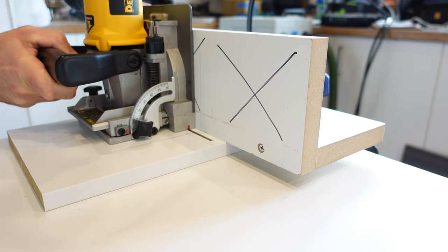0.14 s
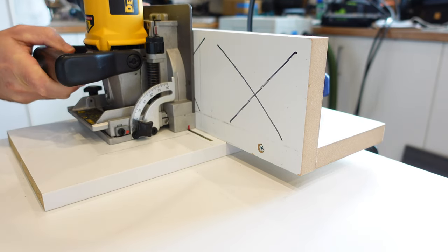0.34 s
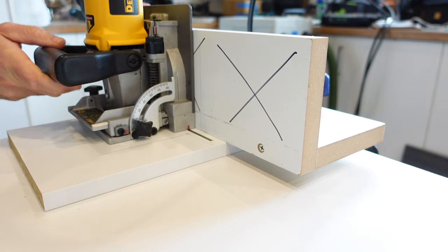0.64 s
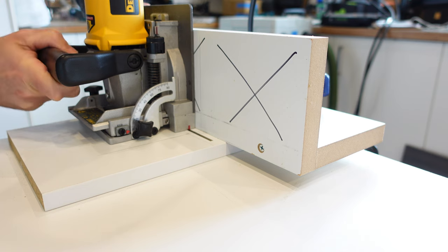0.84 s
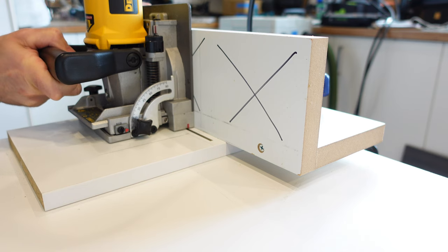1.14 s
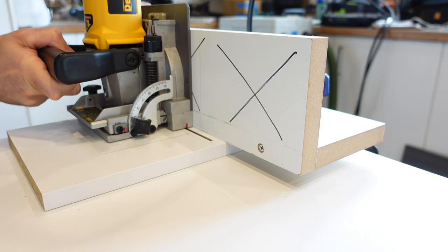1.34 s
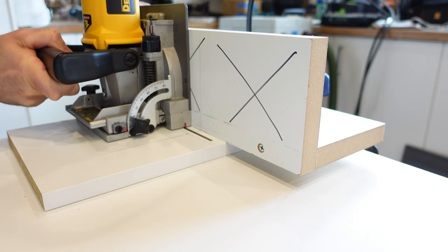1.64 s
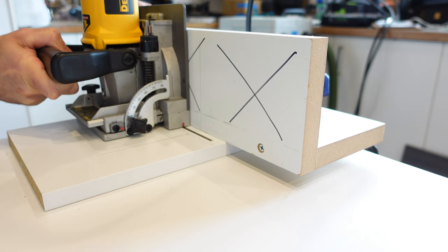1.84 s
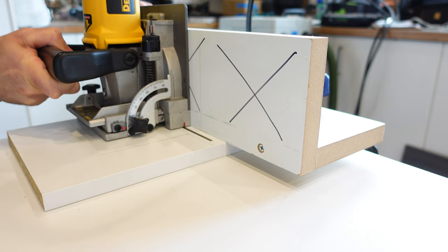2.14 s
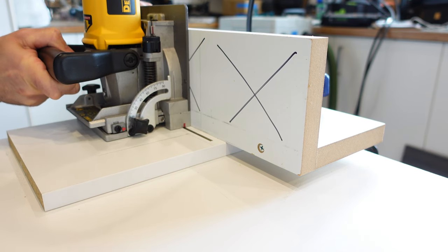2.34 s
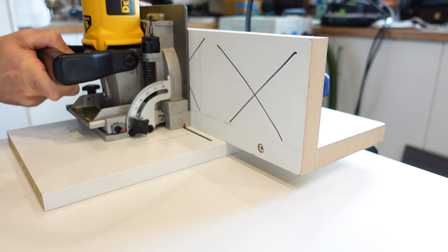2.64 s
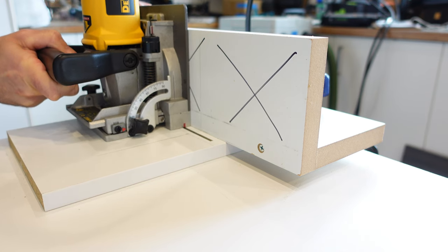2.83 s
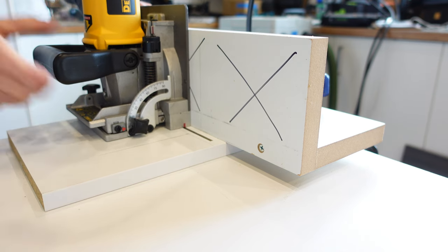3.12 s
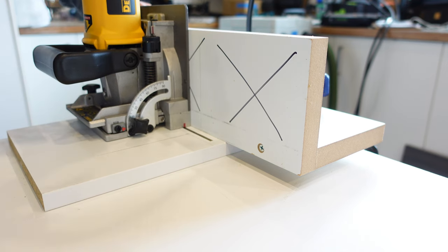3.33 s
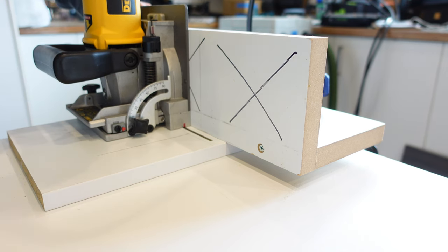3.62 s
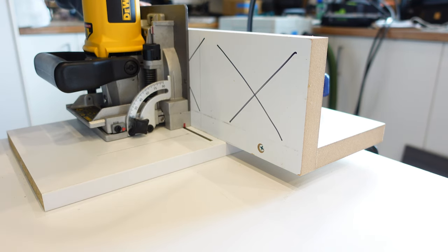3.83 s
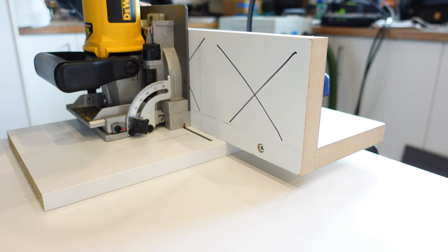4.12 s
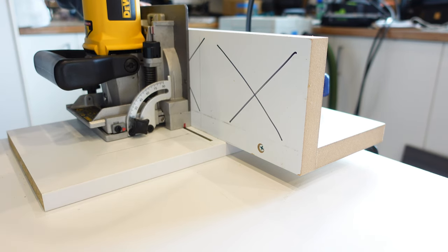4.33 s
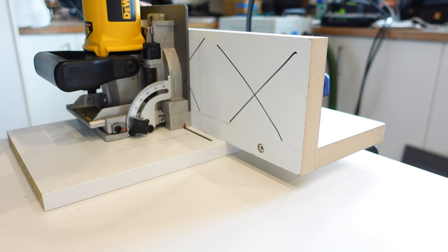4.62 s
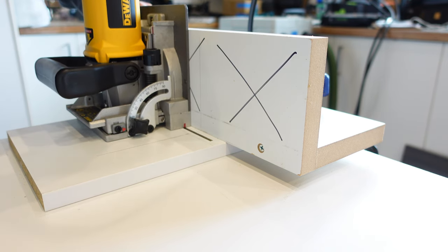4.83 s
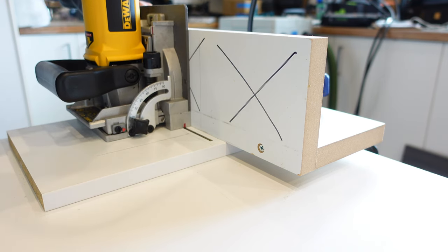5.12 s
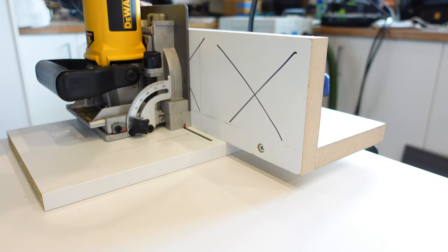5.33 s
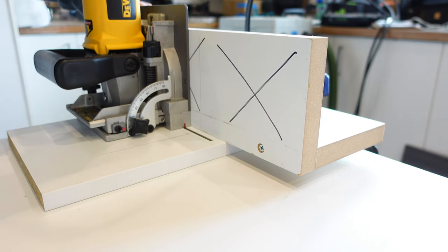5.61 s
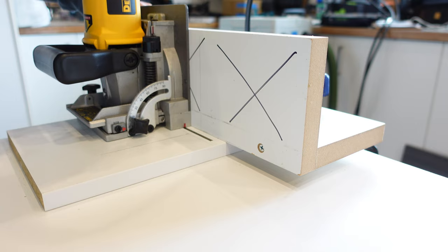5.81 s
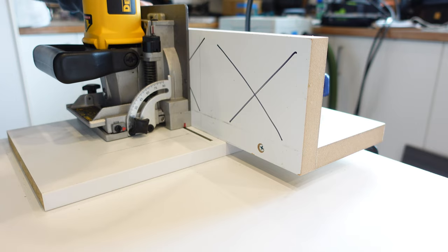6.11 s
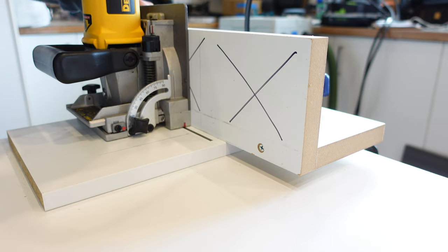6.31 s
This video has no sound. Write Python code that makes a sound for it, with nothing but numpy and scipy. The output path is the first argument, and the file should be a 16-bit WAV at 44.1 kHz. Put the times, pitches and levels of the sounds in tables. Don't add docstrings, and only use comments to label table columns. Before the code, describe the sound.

Scraping, squeaks and sharp taps of a power tool on board, then a click, a roaring rising whine, a brief cut and a clacking coast-down.

```python
import sys
import numpy as np
from scipy import signal
from scipy.fft import rfft, irfft, next_fast_len
from scipy.io import wavfile
from scipy.ndimage import uniform_filter1d, minimum_filter1d, map_coordinates

SR = 44100
rng = np.random.default_rng(int(sys.argv[2]) if len(sys.argv) > 2 else 0)


def log_audio(samples):
    frames = np.atleast_2d(samples).T
    limited = np.clip(frames, -1, 1)
    pcm = np.round(limited * 32767).astype(np.int16)
    wavfile.write(sys.argv[1], SR, pcm)


def field_ratio(decibels):
    return 10 ** (np.asarray(decibels, dtype=float) / 20)


N = 284886
TIME = np.arange(N) / SR

MAINS_HZ = 100
ON_S, RUSH_S, OFF_S = 4.2031, .121, 5.7
MESH = 7.035
STROKE_FALL_DB = 7.5


def unit(x):
    return x / np.sqrt(np.mean(x ** 2) + 1e-20)


def along(points, hz):
    f, v = np.transpose(points)
    return np.interp(np.log(hz + 1), np.log(f + 1), v)


def wobble(rate):
    knots = rng.standard_normal(int(N * rate / SR) + 4)
    return map_coordinates(knots, [np.arange(N) * rate / SR])


def ramp(start_s, length_s):
    return .5 + .5 * np.tanh((TIME - start_s) / length_s)


def band(hz, lo_hz, hi_hz):
    return 1 / np.sqrt((1 + (lo_hz / (hz + 1)) ** 8) * (1 + (hz / hi_hz) ** 8))


def filtered(x, response):
    m = next_fast_len(N + SR // 2)
    return irfft(rfft(x, m) * response(np.fft.rfftfreq(m, 1 / SR)), m)[:N]


def grit(grain_db, rate, lump_db):
    return rng.standard_normal(N) * field_ratio(grain_db * wobble(900) + lump_db * wobble(rate))


def patchy(x, depth_db):
    z = signal.stft(x, nperseg=256)[2]
    field = uniform_filter1d(rng.standard_normal(z.shape), size=3, axis=0)
    field = uniform_filter1d(field, size=24, axis=1)
    return signal.istft(z * field_ratio(depth_db * unit(field)), nperseg=256)[1][:N]


def swells(rows):
    s, half, *cols = np.transpose(rows)[:, :, None]
    t = np.arange(0, N + 64, 64) / SR
    shape_db = -STROKE_FALL_DB * ((t - s) / half) ** 2
    return [np.interp(TIME, t, np.sqrt((field_ratio(db + shape_db) ** 2).sum(axis=0))) for db in cols]


def still_air():
    # (frequency [Hz], density [dB per Hz])
    air_tone = [(15, -47), (25, -23), (120, 2.5), (179, -13), (255, 0.5), (307, -9.5), (513, -6),
                (2150, -23), (5090, -47), (15800, -30.5)]
    return field_ratio(-73) * unit(filtered(rng.standard_normal(N), lambda f: field_ratio(along(air_tone, f))))


def shop(x):
    # (frequency [Hz], time to fall 60 dB [s])
    decay = [(150, 0.64), (1000, 0.23), (4000, 0.33), (12000, 0.012)]
    hz, t, z = signal.stft(rng.standard_normal(SR // 2), SR, nperseg=256)
    tail = signal.istft(z * field_ratio(-60 * t / along(decay, hz)[:, None]), SR, nperseg=256)[1]
    return signal.fftconvolve(np.pad(x, (300, 0)), tail / np.linalg.norm(tail))[:N]


def extractor():
    on_s, shaft_per_rotor = 4.93, .545
    hz = 601 - 190 * np.exp(-np.clip(TIME - on_s, 0, 9) / .33)
    fan = np.sin(2 * np.pi * np.cumsum(hz * (1 + 0.002 * wobble(18))) / SR)
    shaft = np.sin(2 * np.pi * np.cumsum(shaft_per_rotor * speed() * (1 + .004 * wobble(18))) / SR)
    shaft_db = -48 - 6 * ramp(5.8, .06) - 12 * ramp(6.08, .06) + 1.5 * wobble(6)
    gaps = ramp(5.11, .02) - ramp(5.22, .02) + ramp(5.47, .02) - ramp(5.58, .02)
    lines = ramp(on_s, .03) * field_ratio(-46.5 - 9 * gaps + 1.3 * wobble(12)) * fan
    lines = lines + ramp(5.38, .03) * field_ratio(shaft_db) * shaft
    hiss = unit(filtered(rng.standard_normal(N), lambda f: band(f, 11000, 17000)))
    return lines + field_ratio(-70.0) * hiss


def handling():
    # (middle [s], half length [s], weight on the bench [dB], slide [dB], rub [dB])
    strokes = [(0.03, 0.23, -86, -59, -66), (.3, 0.23, -63.5, -61.5, -68.5), (.65, 0.51, -69.5, -71, -79),
               (.94, 0.099, -62, -60.5, -82), (1.13, 0.036, -62, -66, -81), (1.32, 0.096, -63, -60, -71.5),
               (1.48, 0.087, -69, -62.5, -84), (1.66, 0.15, -69, -64.5, -76.5),
               (1.81, 0.087, -58, -61.5, -78.5), (1.94, 0.063, -63, -59, -74), (2.02, 0.065, -62, -62, -82),
               (2.35, 0.9, -79, -90, -87), (2.66, 0.056, -68.5, -90, -84), (2.93, 0.11, -69, -66, -76.5),
               (3.2, 0.19, -74, -72.5, -77.5), (3.36, 0.2, -66, -71.5, -87), (3.52, 0.19, -68, -69.5, -68),
               (3.81, 0.087, -61, -64.5, -68.5), (4.05, 0.93, -74.5, -74.5, -80),
               (4.27, 0.041, -60, -86, -85), (4.75, 0.38, -63, -68, -76), (5.3, 0.37, -59, -58, -86),
               (6.1, 0.33, -66, -75, -79)]
    # (middle [s], half length [s], level [dB])
    sleeve = [
        (.3, 0.14, -94),
        (1.32, 0.036, -80),
        (3.2, 0.048, -72),
        (3.36, 0.1, -81),
        (3.6, 0.039, -79),
        (3.98, 0.047, -91),
    ]
    # (frequency [Hz], density [dB per Hz])
    bench_tone = [(24, -64), (40, -46), (76, -11), (113, 4), (196, 1.5), (291, 1), (400, -1.5), (520, -55),
                  (880, -120)]
    scuff_tone = [(120, -43), (200, 8.5), (239, -11), (369, 6.5), (554, 8), (726, 1.5), (1100, 1.5),
                  (1600, -4), (2400, -14.5), (3120, -44), (5280, -120)]
    rustle_tone = [(940, -30), (1600, 10), (1830, 4.5), (2230, 7), (2660, 8.5), (5000, 2), (6500, -12),
                   (11000, -120)]
    hiss_tone = [(2940, -14.5), (5000, -12), (7140, -13), (7980, -15), (14300, -27), (15800, -23)]

    def hollow(f):
        notes = [(785, 1.2), (1300, .8), (1920, .8)]
        return 1 + sum(lift / (1 + (2 * (f - hz) / 110) ** 2) for hz, lift in notes)

    weight, slide, rub = swells(strokes)
    cloth = field_ratio(-83) * (rub / field_ratio(-72.5)) ** 0.93 + swells(sleeve)[0] + field_ratio(-87.5)
    out = np.zeros(N)
    for gain, tone, lump_db in [(weight, bench_tone, 1.4), (slide, scuff_tone, 2.3),
                                (rub, rustle_tone, 1.15), (cloth, hiss_tone, 1.5)]:
        noise = grit(grain_db=-0.5, rate=54, lump_db=lump_db)
        out = out + gain * unit(filtered(noise, lambda f: field_ratio(along(tone, f)) * hollow(f)))
    return out


def drag():
    # (middle [s], half length [s], hum [dB], squeal [dB])
    pulls = [
        (.03, 0.2, -57.5, -95),
        (0.315, 0.15, -59, -71),
        (0.627, 0.26, -66, -87),
    ]
    # (frequency [Hz], width [Hz])
    modes = [(770, 220), (4250, 2000)]
    out = np.zeros(N)
    for gain, (hz, wide_hz) in zip(swells(pulls), modes):
        noise = grit(grain_db=-2, rate=27.3, lump_db=-0.5)
        out = out + gain * unit(filtered(noise, lambda f: 1 / (1 + (2 * (f - hz) / wide_hz) ** 2)))
    return out


def squeaks():
    # (middle [s], half length [s], frequency [Hz], glide [Hz per s], level [dB])
    slips = [
        (.31, .1, 4150, 1800, -70),
        (.3, .06, 4950, 900, -76),
        (.28, .05, 5900, 2000, -77),
        (2.93, .05, 1100, 4000, -70),
        (3.2, .04, 6100, 3000, -76),
        (3.81, .025, 3100, 9000, -71),
        (1.57, .02, 1950, 0, -69),
        (1.7, .025, 1980, 0, -69),
        (2.0, .02, 1200, 0, -57),
        (1.75, .03, 980, 0, -59.5),
    ]
    out = np.zeros(N + SR)
    for s, half, hz, glide, db in slips:
        t = np.arange(-2 * half, 2 * half, 1 / SR)
        rows = np.repeat([[0], [1]], len(t), 1)
        drift = map_coordinates(rng.standard_normal((2, 300)), [rows, [(t - t[0]) * 500] * 2])
        note = np.sin(2 * np.pi * np.cumsum((hz + glide * t) * (1 + .08 * drift[0])) / SR)
        level = field_ratio(db + 3 * drift[1] - STROKE_FALL_DB * (t / half) ** 2)
        out[round((s - 2 * half) * SR):][:len(t)] += level * note
    return out[:N]


def ticks():
    # (time [s], peak [dB], ring [Hz])
    parts = [(0.1147, -36.5, 3080), (0.1151, -41, 1590), (0.83, -50, 2580), (0.9308, -44, 2600),
             (1.153, -30, 5160), (1.2525, -49, 5300), (1.318, -43, 2540), (1.317, -38, 5130),
             (1.284, -42, 3900), (.855, -50, 2000), (1.022, -56, 3900), (1.635, -33.5, 1256),
             (1.6347, -34.5, 3000), (1.636, -35, 4730), (1.667, -51, 5300), (1.682, -50, 5300),
             (2.622, -44.5, 1460), (1.7565, -49, 2850), (1.901, -36, 4340), (1.902, -36, 5100),
             (1.903, -56, 5300), (1.9013, -45, 7700), (1.9345, -53, 5000), (2.6848, -55, 4760),
             (2.8426, -62, 2320), (3.4328, -43.5, 2280), (3.7244, -52, 5500), (3.9858, -56, 4360),
             (4.1494, -59, 6560), (4.1814, -59, 7000)]
    fence_hz = [1610, 2260, 3500, 4730, 7250]
    out, t = np.zeros(N + SR), np.arange(SR // 8) / SR
    rattle = []
    for hz, (u, v) in zip(np.resize(fence_hz, 60), rng.random(size=(60, 2))):
        db = -34 - 17 * u - 6 * v - 3.5 * np.log2(hz / 2000)
        rattle.append((1.268 + .1 * u ** 1.9, db, hz))
    for s, db, hz in parts + rattle:
        modes = [(1.5, 1), (.6, rng.uniform(.82, .92)), (.5, rng.uniform(1.08, 1.25))]
        trio = sum(g * np.sin(2 * np.pi * hz * k * t) for g, k in modes)
        decay = field_ratio(db - 10.0 - 60 * t * hz / 49)
        out[round((s + .001) * SR):][:len(t)] += decay * trio * (1 - np.exp(-t / 0.00027))
    return out[:N]


def knocks():
    # (time [s], peak [dB], ring [Hz], crack [dB], fizz [dB])
    tool_blows = [(0.828, -51, 684, -12, -41), (0.845, -26.5, 748, -16.5, -63), (0.869, -46, 740, -30, -55),
                  (0.929, -46, 1200, -24, -49), (0.967, -39, 1334, -10, -30), (1.031, -49.5, 566, -18, -46),
                  (1.13, -45, 1100, -11, -49), (1.138, -23.5, 812, -27, -48),
                  (1.153, -37, 596, -8.5, -25.5), (1.163, -44, 630, -30, -55), (1.221, -44, 847, -35, -44),
                  (1.251, -43.5, 1610, -12, -44), (1.263, -33.5, 1190, -8, -38),
                  (1.312, -23.5, 1610, -20.5, -51), (1.632, -37, 760, -11, -55),
                  (1.669, -49, 1150, -8, -34), (1.711, -48.5, 624, -24, -43), (1.809, -35.5, 570, -39, -59),
                  (2.841, -54, 650, -5, -25), (4.119, -54.5, 920, -19, -41), (4.173, -53, 875, -11, -31)]
    # (time [s], peak [dB], ring [Hz], bench thump [dB])
    base_bumps = [(0.114, -42, 765, -11), (1.059, -51.5, 586, -15), (1.094, -53, 230, -2),
                  (1.487, -51.5, 620, -2), (1.955, -30.5, 780, -4.5), (2.37, -55, 770, 3.5),
                  (2.623, -43, 772, 2.5), (2.655, -50, 730, -22), (2.749, -56.5, 840, -1),
                  (2.765, -62, 344, -17), (2.801, -56.5, 855, -16), (2.893, -60, 885, -17),
                  (2.911, -57, 855, -17), (2.924, -53, 760, -10), (2.954, -46, 754, -1),
                  (2.977, -47.5, 755, -2), (3.393, -56, 224, -4), (3.431, -48, 806, -1.5),
                  (3.712, -40, 600, 2), (3.729, -51, 464, 8), (4.227, -35, 760, -30), (4.232, -50, 139, 3),
                  (4.234, -38, 700, -33)]
    # (frequency [Hz], gain [dB])
    board_tone = [(30, -60), (70, -14), (150, -2.5), (300, 2.5), (520, 3), (790, 4.5), (1200, -6),
                  (1600, -8), (2400, -17.5), (4000, -84)]
    t = np.arange(SR // 5) / SR

    def fade(t60, rise):
        return field_ratio(-60 * t / t60) * (1 - np.exp(-t / rise))

    def sine(hz):
        return np.sin(2 * np.pi * hz * t)

    tones, board, crack, fizz = np.zeros((4, N + SR))
    blows = [(s, db, hz, -38, crack_db, fizz_db) for s, db, hz, crack_db, fizz_db in tool_blows]
    bumps = [(s, db, hz, thump_db, -22.5, -93 - db) for s, db, hz, thump_db in base_bumps]
    for s, db, hz, thump_db, crack_db, fizz_db in blows + bumps:
        start = round((s + .0025) * SR)
        at = slice(start, start + len(t))
        shake = rng.standard_normal((3, len(t)))
        ring = fade(0.059 * (800 / hz) ** .5, 0.0003) * (sine(hz) + 0.31 * sine(0.96 * hz))
        thump = field_ratio(thump_db + 8) * fade(0.09, 0.003) * (sine(140) + 0.4 * sine(225))
        tones[at] += field_ratio(db - 6.0) * (ring + thump)
        board_db = db + 8.5 - 14 * np.log2(max(hz, 800) / 800)
        board[at] += field_ratio(board_db) * (fade(0.035, 0.0016) + 0.12 * fade(0.09, 0.012)) * shake[0]
        crack[at] += field_ratio(db + crack_db + 6) * (fade(.022, .0004) + .2 * fade(.14, .004)) * shake[1]
        fizz[at] += field_ratio(db + fizz_db + 32.5) * (fade(0.015, .0003) + 0.11 * fade(0.074, 0.0037)) * shake[2]
    out = filtered(tones[:N], lambda f: band(f, 118, 9000))
    out = out + filtered(board[:N], lambda f: field_ratio(along(board_tone, f)))
    out = out + filtered(crack[:N], lambda f: band(f, 850, 4540))
    return out + filtered(fizz[:N], lambda f: band(f, 7700, 8100) * 6000 / (f + 6000))


def switch():
    out = np.zeros(N)
    for s, db, t60 in [(4.2082, -34, .03), (4.2133, -13, .013)]:
        t = np.clip(TIME - s, 0, 1)
        rings = 0.52 * np.sin(2 * np.pi * 830 * t) + 0.33 * np.sin(2 * np.pi * 1750 * t)
        out = out + field_ratio(db - 60 * t / t60) * (t > 0) * (rings + rng.standard_normal(N))
    return filtered(out, lambda f: band(f, 360, 4900) + 0.13)


def speed():
    plunge_s = 4.88
    on = np.clip(TIME, ON_S, OFF_S) - ON_S
    load = np.clip(TIME, plunge_s, OFF_S) - plunge_s
    off = np.clip(TIME, OFF_S, 99) - OFF_S
    hz = 684 * (1 - np.exp(-on / RUSH_S)) + 225.5 * on
    hz = hz - 19.7 * (1 - np.exp(-load / .04)) - 127.4 * load
    hz = hz - 24 * np.exp(-((TIME - 4.232) / .012) ** 2) - 20 * np.exp(-on / .08)
    return np.maximum(hz, 0) * np.exp(-.635 * off - .106 * off ** 2)


def cutting():
    return ramp(4.975, .02) * (1 - ramp(5.53, .08))


def casing(hz):
    # (frequency [Hz], density [dB per Hz])
    housing = [(24, -68), (40, -39), (123, -25.5), (303, -14), (453, -5), (825, 5), (983, -2), (1620, -2.5),
               (2080, -9.5), (3190, -2.5), (4200, -4.5), (5530, -3.5), (8040, -9), (9110, -11),
               (15800, -29.5)]
    # (frequency [Hz], width [Hz], level over the roar [dB])
    metal = [(2490, 30, 4), (2630, 30, 3), (2800, 200, 4), (3150, 300, 4.5), (3420, 150, 3.5),
             (4200, 800, -3.5), (5450, 300, 3), (6030, 45, 7), (7370, 50, 4), (7615, 60, 5),
             (8850, 200, 8.5), (9400, 800, 2), (9520, 70, 9), (11610, 90, 11), (12400, 70, 8)]
    rings = sum((field_ratio(db) - 1) / (1 + (2 * (hz - c) / w) ** 2) for c, w, db in metal)
    return field_ratio(along(housing, hz)) * (1 + rings)


def roar_levels(settle_s=0.17):
    # (level [dB], change in the cut [dB], drop at switch-off [dB], climb while coasting [dB per s])
    bands = [
        (-36.5, 1, -8.5, 14.5),
        (-36.5, 2, -11, 7),
        (-55, 6.5, -11.5, 7.5),
        (-50, -2.5, -25.5, 20),
    ]
    # (time [s], level [dB], half length [s])
    sparks = [
        (4.23, -8, 0.034),
        (4.29, 9.5, 0.011),
        (4.413, 3, 0.0093),
        (4.485, 6.5, 0.017),
        (4.557, 6, 0.029),
        (4.916, 5, 0.048),
    ]
    shares = [0.033, .4, 0.65, 1]
    off = np.clip(TIME - OFF_S, 0, 9)
    flare = sum(db * np.exp(-((TIME - s) / half) ** 2) for s, db, half in sparks)
    levels = []
    for (db, cut_db, drop_db, climb_db), share in zip(bands, shares):
        coast_db = drop_db * (1 - np.exp(-off / settle_s)) + climb_db * off
        levels.append(db + cut_db * cutting() + coast_db + share * flare)
    return levels


def mains_kicks():
    when = np.arange(4.2362, OFF_S, 1 / MAINS_HZ)
    strength = field_ratio(-3 - 14 * abs(when - 4.36) + 1.5 * rng.standard_normal(len(when)))
    jittered = when + .0005 * rng.standard_normal(len(when))
    kicks = np.zeros(N)
    kicks[(jittered * SR).astype(int)] = strength * (-1) ** np.arange(len(when))
    return filtered(kicks, lambda f: band(f, 400, 3600) * (1 + .8 * band(f, 400, 640)))


def gear_clacks():
    # (time [s], peak [dB])
    slack_hits = [
        (5.848, -28),
        (5.9927, -28),
        (6.0535, -39),
        (6.0964, -44),
        (6.1543, -29),
        (6.26, -27.5),
        (6.3, -27.5),
        (6.378, -36),
        (6.3972, -43),
        (6.4192, -33),
    ]
    s, db = np.transpose(slack_hits)
    clacks = np.zeros(N)
    clacks[(s * SR).astype(int)] = field_ratio(db - 0.5)
    t = TIME[:SR // 50]
    clacks = np.convolve(clacks, field_ratio(-60 * t / 0.018) * rng.standard_normal(len(t)))[:N]
    return filtered(clacks, lambda f: band(f, 3700, 5400) ** 2 + .06 * band(f, 6000, 9500) ** 2)


def roar():
    patch_depths = [.6, 1, 1.5, 1.5]
    throb_db = 2.2 + 1.8 * np.exp(-((TIME - 4.35) / .06) ** 2)
    throb = field_ratio(throb_db * np.cos(2 * np.pi * MAINS_HZ * (TIME - 4.3362)) * (TIME < OFF_S))
    slaps = (rng.random(N) < 420 / SR) * rng.standard_normal(N)
    edges = [(30, 2200), (2000, 5400), (6500, 31500), (10500, 13000)]
    out = np.zeros(N)
    for db, (lo, hi), depth_db in zip(roar_levels(), edges, patch_depths):
        noise = grit(grain_db=1.5, rate=60, lump_db=.5 + .4 * depth_db)
        shake = (noise + (4 if hi < 7000 else 3) * slaps) * throb
        out = out + field_ratio(db) * unit(filtered(patchy(shake, depth_db), lambda f: casing(f) * band(f, lo, hi)))
    return out + mains_kicks() + gear_clacks()


def tone_levels(hz):
    # (frequency [Hz], level [dB])
    rotor_response = [(300, -60), (525, -40), (565, -41), (605, -37.5), (650, -34), (780, -33.5),
                      (900, -33.5)]
    octave_response = [(1000, -44), (1070, -42), (1140, -36), (1300, -35.5), (1430, -38.5), (1560, -37),
                       (1690, -42), (1800, -47)]
    driven_mesh = [(380, -38), (560, -43), (780, -38), (1050, -45), (1500, -36.5), (1850, -35.5),
                   (2350, -49), (2800, -34), (3300, -45), (3800, -54), (6400, -56)]
    coasting_mesh = [(3880, -64), (3960, -47), (4300, -49), (4560, -46), (4750, -57), (5150, -47.5),
                     (5400, -52), (5550, -48), (5750, -52), (6000, -46), (6200, -57)]
    mesh_octave = [(2000, -52), (2900, -38), (4000, -49), (5800, -46), (7900, -74), (8300, -64),
                   (9150, -61), (9500, -74), (10800, -73), (11150, -60.5), (11550, -64), (11850, -67),
                   (12300, -63)]
    # (frequency [Hz], width [Hz], level [dB])
    mesh_peaks = [(5230, 600, 16.5), (5680, 160, 7), (5900, 140, 6), (6050, 150, 15), (6220, 120, 7)]
    inrush_db = -85 * np.exp(-np.clip(TIME - ON_S, 0, 9) / RUSH_S)
    masked_db = inrush_db - 12.5 * cutting()
    coast = ramp(OFF_S, 0.17 / 4)
    mesh_hz = MESH * hz
    peaks_db = sum(db * np.exp(-(2 * (mesh_hz - c) / w) ** 4) for c, w, db in mesh_peaks)
    mesh_db = (1 - coast) * (along(driven_mesh, mesh_hz) + peaks_db) + coast * along(coasting_mesh, mesh_hz)
    rotor_db = along(rotor_response, hz) - 2 * (1 - coast) + masked_db
    octave_db = along(octave_response, 2 * hz) - 13 * (1 - coast) + 1.3 * masked_db
    return rotor_db, octave_db, mesh_db, along(mesh_octave, 2 * mesh_hz)


def whine():
    # (multiple [1], level [dB])
    overtones = [(3, -46), (4, -46.5), (5, -46), (6, -50)]
    # (frequency [Hz], gain [dB])
    gearbox = [(1600, 7), (1850, -2), (1950, -8), (2200, -8), (2350, -1.5), (2620, 1.5), (2800, 1.5),
               (2980, 5), (3120, 2), (3250, -9), (3550, -4), (3900, -14), (4950, -8)]
    hz = speed()
    tone_db, octave_db, mesh_db, mesh2_db = tone_levels(hz)
    turn = 2 * np.pi * np.cumsum(hz * (1 + 0.0011 * wobble(30))) / SR
    free = np.clip((TIME - OFF_S + 0.054) / 0.081, .12, 1)
    slack = np.clip(1 - hz / 700, 0, 1)
    chatter_db = 3 * wobble(70) - 3 + 10 * np.cos(2 * np.pi * MAINS_HZ * (TIME - 4.256))
    chatter = field_ratio(slack * chatter_db) * np.exp(1.1j * slack * wobble(130))
    unsteady_db = (.8 + 8 * np.clip(1 - hz / 770, 0, .4)) * wobble(35)
    out = field_ratio(tone_db + 4.0 + unsteady_db) * np.sin(turn)
    octave_phase = np.pi / 2 * np.tanh((hz - 620) / 50)
    out = out + field_ratio(octave_db + 3 + 1.2 * wobble(35)) * np.sin(2 * turn + octave_phase)
    for k, db in [(MESH, mesh_db), (2 * MESH, mesh2_db)]:
        level = field_ratio(db + 1.5 + 2 * slack + 2 * wobble(20))
        out = out + level * np.imag(chatter * np.exp(1j * k * turn))
    for k, db in overtones:
        level = field_ratio(db + along(gearbox, k * hz) + 3 + 2.2 * wobble(18))
        out = out + free * level * np.sin(k * turn + k * k)
    return out


def scene():
    running = np.clip((TIME - 4.212) / .004, 0, 1)
    taps = knocks() + ticks()
    echo = field_ratio(-16) * shop(taps)
    hands = handling() + drag() + squeaks()
    machine = running * (extractor() + roar() + whine())
    return (still_air() + hands + taps + echo + switch() + machine)[None]


def band_limit(x):
    return signal.sosfilt(signal.butter(12, 16450, fs=SR, output="sos"), x)


def record(dry):
    ceiling, top_hz = .088, 15750
    need = np.minimum(1, ceiling / (abs(dry[0]) + 1e-9))
    gain = uniform_filter1d(minimum_filter1d(need, size=61), size=61)
    mix = filtered(gain * dry[0], lambda f: f < top_hz)[None]
    return band_limit(mix)


dry = scene()
out = record(dry)
log_audio(out)
```